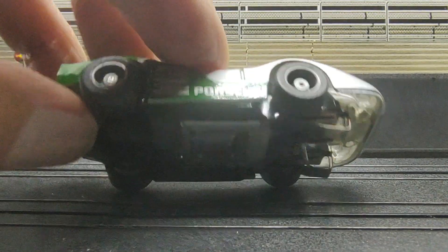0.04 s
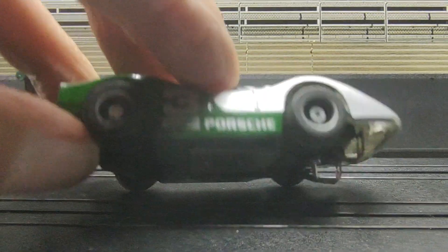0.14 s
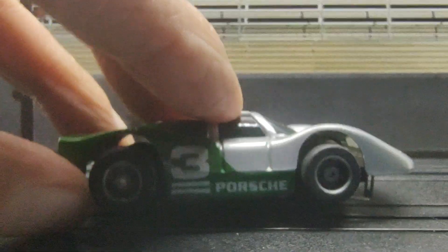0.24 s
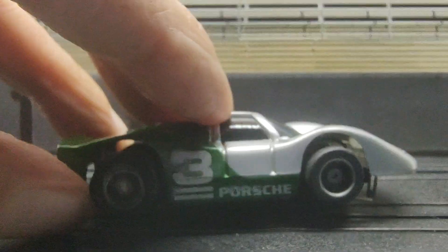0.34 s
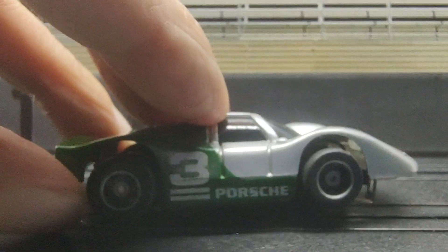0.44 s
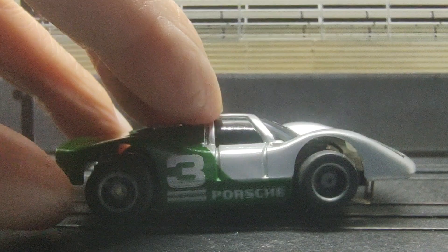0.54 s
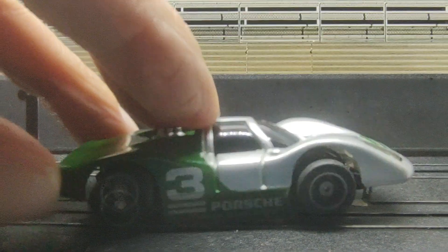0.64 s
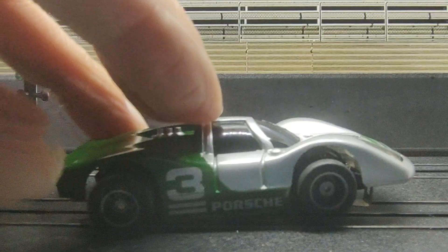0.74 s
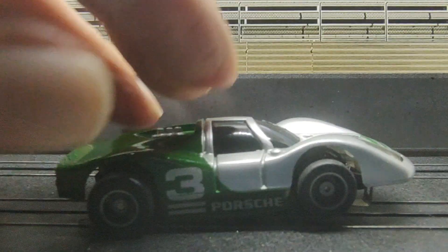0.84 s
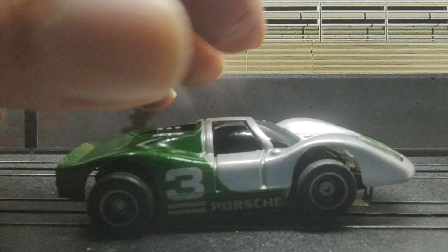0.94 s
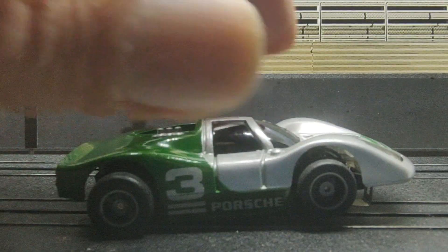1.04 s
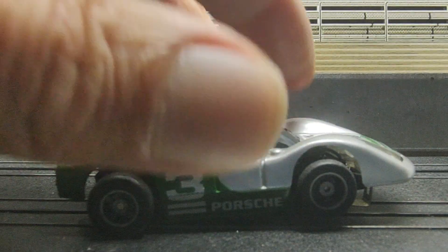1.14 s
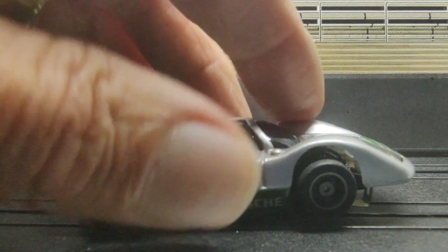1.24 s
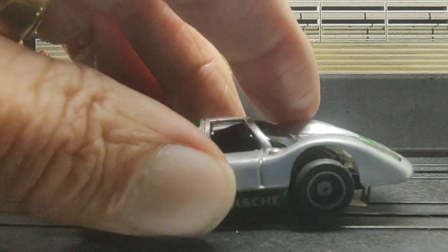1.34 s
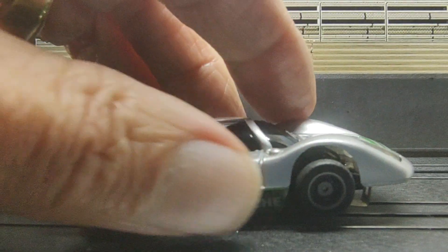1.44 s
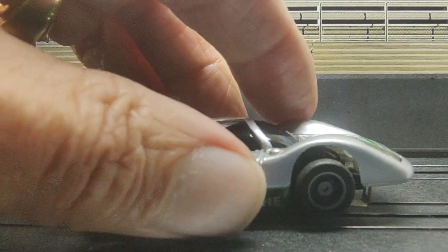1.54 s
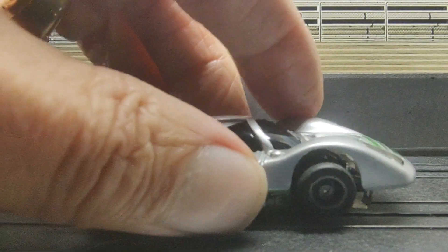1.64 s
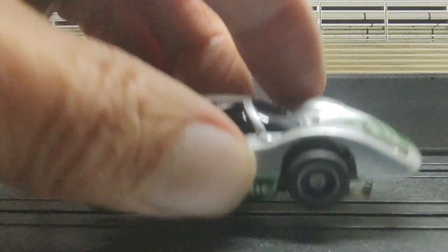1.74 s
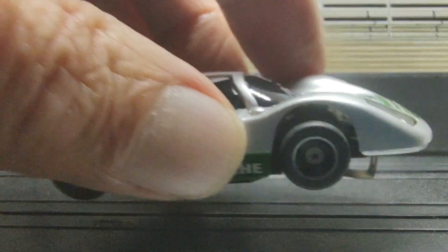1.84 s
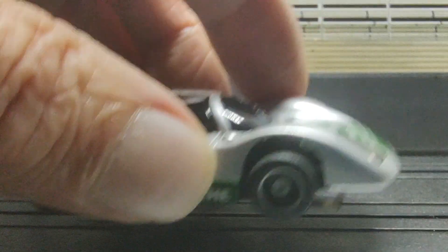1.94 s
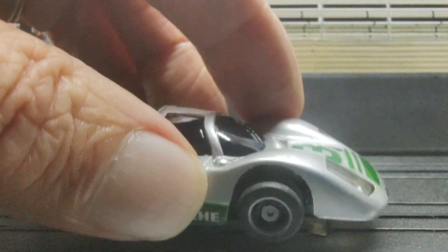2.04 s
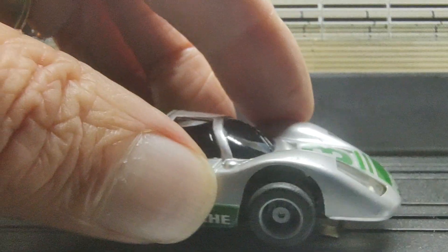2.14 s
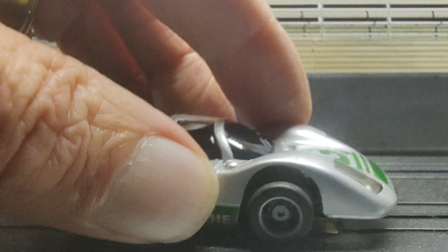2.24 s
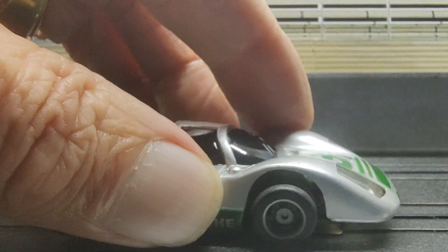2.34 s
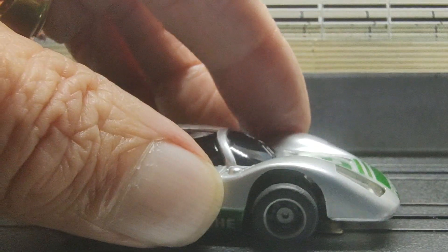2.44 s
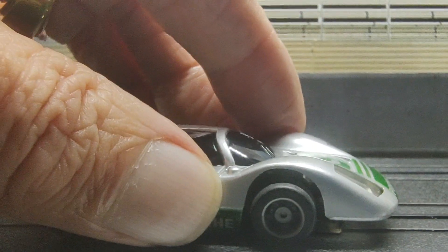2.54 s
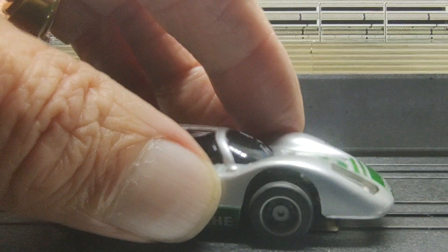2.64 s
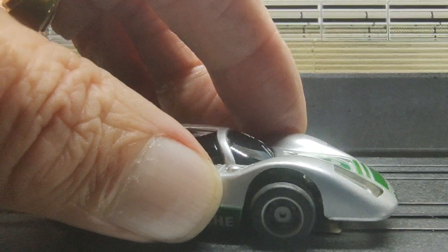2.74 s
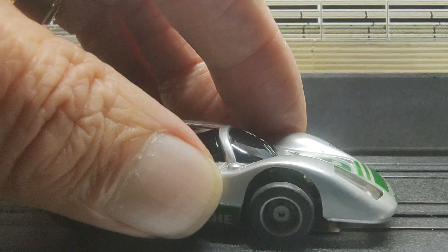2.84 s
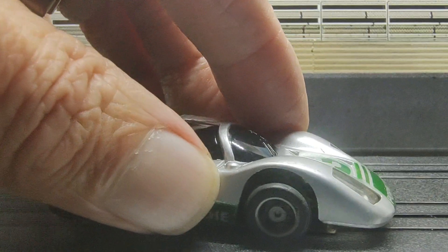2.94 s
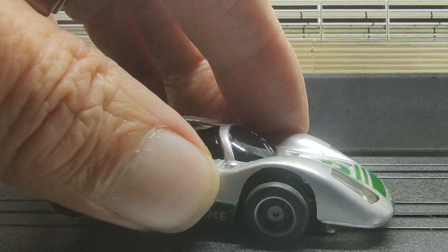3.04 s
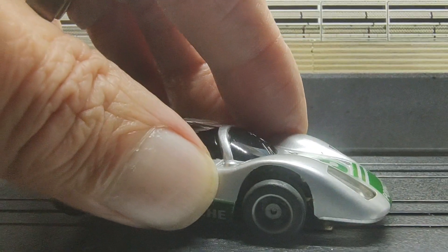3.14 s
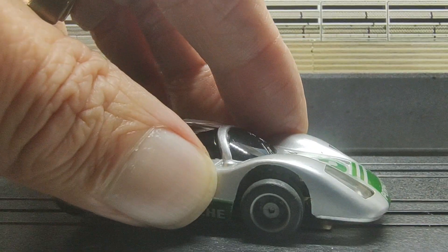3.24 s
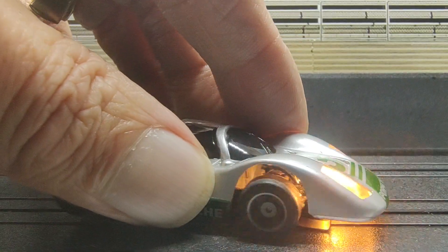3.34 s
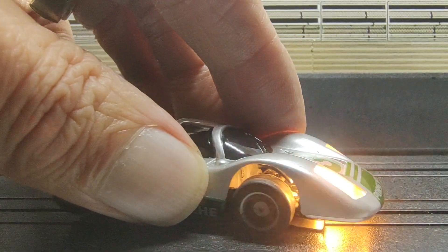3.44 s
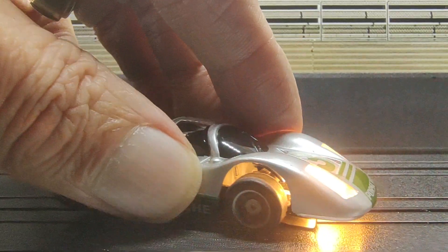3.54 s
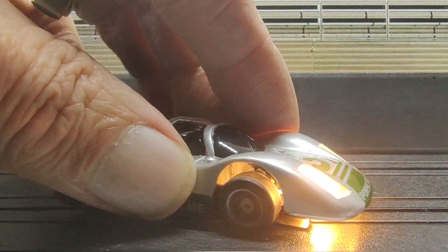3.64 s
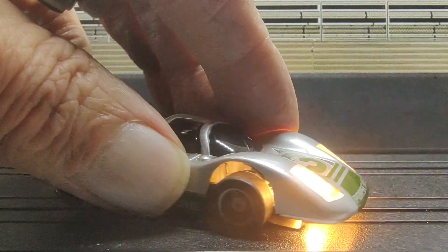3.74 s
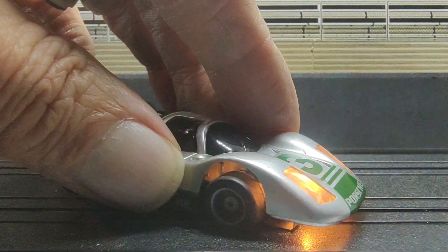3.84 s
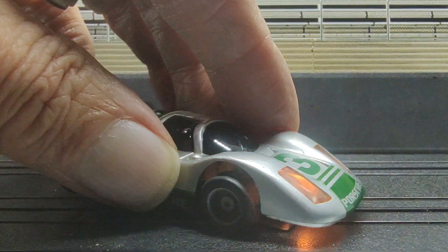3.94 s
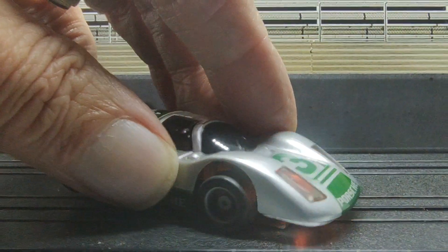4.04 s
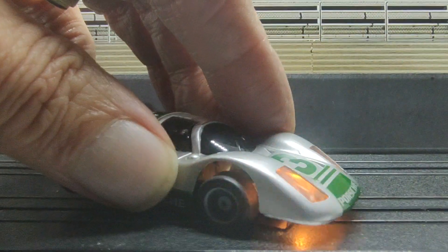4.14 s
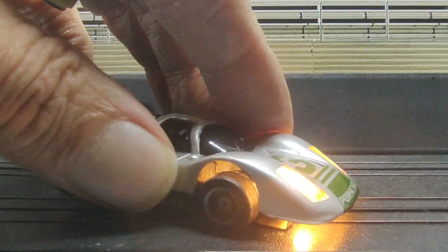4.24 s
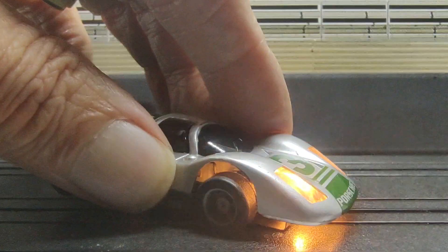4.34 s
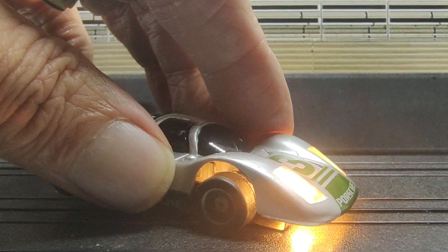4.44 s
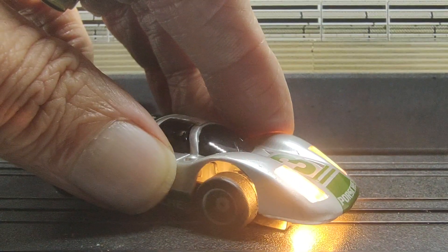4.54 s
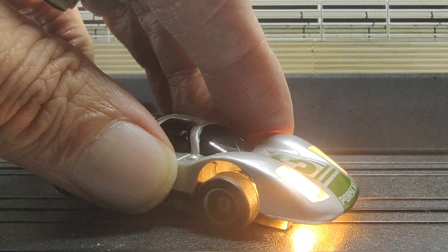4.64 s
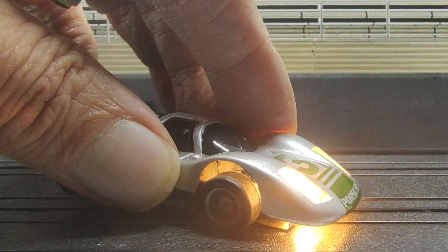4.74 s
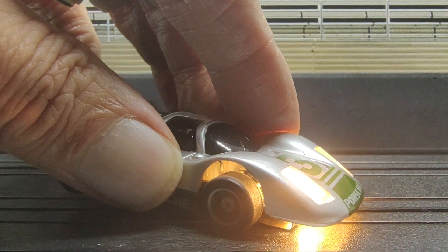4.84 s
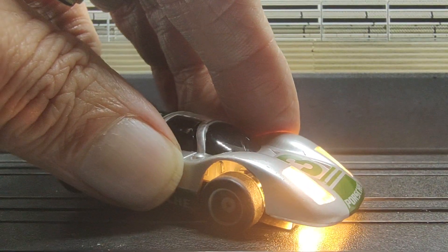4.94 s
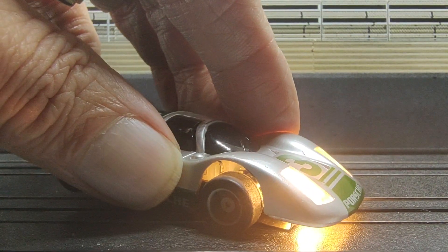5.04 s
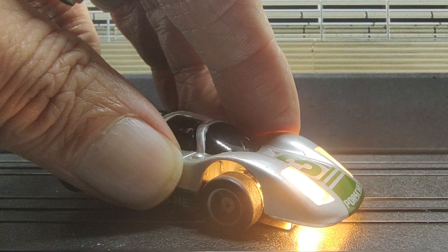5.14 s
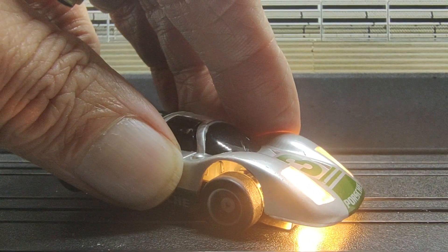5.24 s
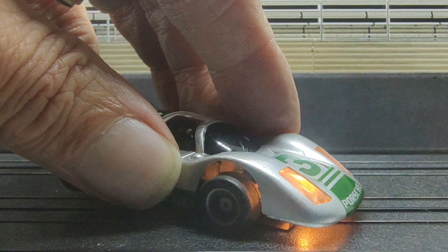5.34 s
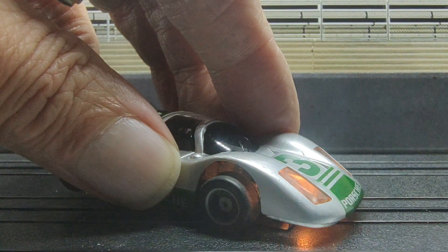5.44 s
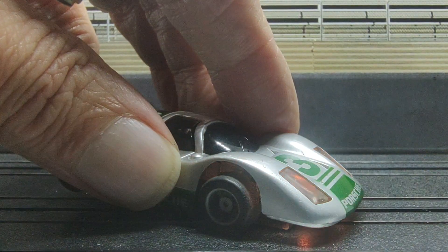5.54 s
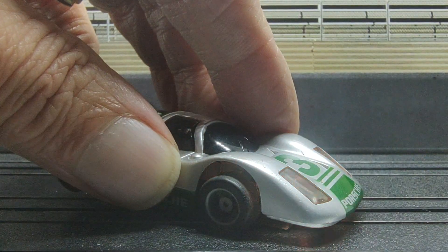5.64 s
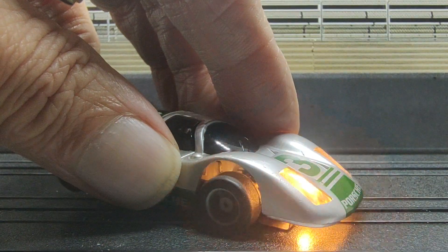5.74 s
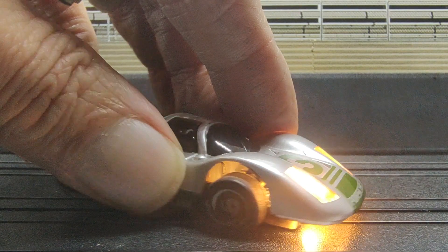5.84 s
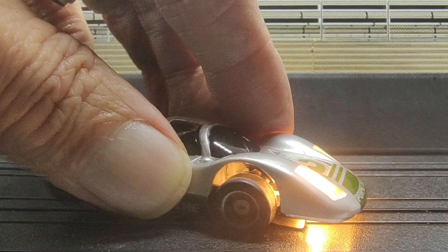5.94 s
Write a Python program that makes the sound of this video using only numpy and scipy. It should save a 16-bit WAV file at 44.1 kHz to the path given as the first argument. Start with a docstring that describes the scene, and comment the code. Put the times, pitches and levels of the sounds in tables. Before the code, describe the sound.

Dry plastic ticks and soft skin hiss come first, with one sharp click at 0.7 seconds and small metallic snaps. Then a hand-held toy car spins its wheels freely: a grainy electric whine swoops up, chatters loudly, and sinks in pitch. Two more revs follow, the middle one longest. Close stereo microphone, dry, little room sound.

```python
"""Toy slot car held on its track

Fingers tick, knock and rub a toy slot car on its plastic track, then hold it with the rear wheels spinning free.
The throttle opens three times: the unbalanced rotor whines as sine tones that follow its speed.
A 7-tooth pinion rattles in a 25-tooth crown gear; its strikes are bursts of noise, coloured by shell and chassis.
The brushes add rough overtones, and a power supply hums under it all.
"""
import sys
import numpy as np
from scipy import signal
from scipy.fft import rfft, irfft, next_fast_len
from scipy.io import wavfile
from scipy.ndimage import uniform_filter1d

SR = 44100
rng = np.random.default_rng(int(sys.argv[2]) if len(sys.argv) > 2 else 0)


def store_wav(level_fs):
    """Save 16-bit WAV to argv[1]."""
    pcm = np.round(np.clip(np.atleast_2d(level_fs), -1, 1) * 32767)
    wavfile.write(sys.argv[1], SR, pcm.T.astype(np.int16))


N = 264600  # samples: six seconds

# All levels are relative: later steps add offsets and swings. Colours are scaled to unit energy when used.

# power-supply hum: f/Hz, level/dB
HUM_TONES = [(118.4, -68), (242.2, -79)]
# colour of the room's murmur: f/Hz, level/dB
ROOM_COLOUR = [(15, -48), (25, -27), (64, -9), (95, -13.5), (121, 1), (167, -3.5), (404, -13), (604, -20.5),
               (927, -20), (1150, -27.5), (5570, -29), (8320, -27), (15000, -36)]
# likeness of left and right noise: f/Hz, likeness (0-1)
LIKENESS = [(60, 1), (250, 0.82), (500, 0.86), (1000, 0.34), (2000, 0.47), (4000, 0.057), (8000, 0.031),
            (15000, 0.054)]
# balance of the two sides: f/Hz, left minus right level/dB
SIDE_BALANCE = [(60, 0), (92, -4), (140, 1.5), (210, 0), (330, 1.5), (500, -3), (770, 5.5), (1170, -1.5),
                (1790, -1), (2740, -2.5), (4190, 2.5), (6410, -8.5), (9810, 3.5), (15000, 1.5)]
# timing of the two sides: f/Hz, left ahead of right phase/rad
SIDE_LEAD = [(0, -1.5), (1380, 0.78), (3620, 6.5), (4910, 20), (5340, 21), (5770, 16), (6290, 16),
             (7490, 18), (8100, 24), (9130, 23.5), (10400, 31), (12100, 36), (12700, 43), (13600, 45),
             (14500, 44.5), (15500, 45)]

# plastic contacts in handling: t/s, tick level/dB, body level/dB, knock level/dB
CONTACTS = [(0.2101, -45.5, -58, -62.5), (0.221, -60, -73, -72), (0.2986, -42, -61, -70),
            (0.3197, -42, -59, -74), (0.332, -36.5, -41.5, -44.5), (0.341, -53, -62, -51),
            (0.351, -56, -65, -60), (0.509, -52, -74, -63), (0.702, -39, -53, -44.5),
            (0.7063, -24.5, -61, -49), (0.712, -35, -57, -45.5), (0.721, -38, -60, -49.5),
            (1.761, -51, -67, -67), (1.803, -60, -73, -69), (1.829, -49, -65, -68), (1.841, -33, -56, -68),
            (2.0853, -51, -71, -71), (2.1905, -50, -58, -83), (2.2033, -56, -57, -64.5),
            (2.247, -64, -70, -70), (2.324, -64, -73, -66), (2.355, -60, -70, -69),
            (2.366, -30.5, -55, -72), (2.374, -38, -62, -60), (2.381, -45, -60, -71),
            (2.3965, -39.5, -58, -71), (2.582, -60, -57, -65.5), (2.9637, -51, -57, -90),
            (2.992, -62, -63, -87), (3.214, -47, -58, -75), (3.226, -54, -55, -67), (3.244, -53, -68, -76),
            (3.256, -49, -71, -79), (3.334, -36, -52, -84), (3.349, -45, -54, -76)]
# finger strokes: start t/s, length t/s, hiss level/dB, scrape level/dB
FINGER_STROKES = [(-.03, 0.045, -70, -77), (0.11, .08, -73, -87), (0.236, 0.14, -65, -74),
                  (0.47, 0.21, -69, -77), (.75, 0.21, -77, -79), (1.367, 0.28, -70.5, -86),
                  (1.544, 0.37, -70, -77), (1.782, 0.056, -62.5, -66.5), (1.95, 0.27, -76, -78),
                  (2.193, 0.091, -76, -73), (2.292, 0.13, -70, -72), (2.37, 0.25, -68, -75.5),
                  (2.6, 0.81, -71.5, -79), (2.91, 0.1, -67.5, -75), (3.125, .1, -65.5, -74),
                  (3.19, 0.082, -59, -68)]
# colours of shell tick, hollow-track knock and rubbing skin: f/Hz, level/dB
TICK_COLOUR = [(1180, -21), (2000, -24), (2700, -31), (3390, -16), (5000, -10), (6770, -15), (8550, 3.5),
               (9570, 3), (10200, 0), (12000, -18), (13800, -26), (15800, -22)]
KNOCK_COLOUR = [(47, -27), (80, -5), (140, 4.5), (230, -3.5), (400, -5.5), (560, -14), (800, -1),
                (1080, -12), (1380, -3), (1700, -13), (2500, -20), (3250, -24), (5500, -120)]
SKIN_COLOUR = [(5000, -22), (7400, -13.5), (8200, -4.5), (9600, -8), (11000, -17), (15000, -33)]
# resonances of the hand-held plastic body: f/Hz, width f/Hz, level/dB
BODY_MODES = [(930, 91, 12.5), (1370, 150, 7.5), (1850, 130, 13), (2300, 210, 9.5), (3100, 250, 7.5),
              (3480, 180, 5.5), (4060, 320, 7.5), (5030, 300, 7.5), (5750, 250, 1), (7260, 500, 5.5)]
STROKE_ATTACK_S, STROKE_RELEASE_S = 0.04, 0.051  # a stroke's rise and fade
GRIP_DB = -81  # the faint creep of the resting grip
SLIPS_PER_S, SLIP_SPREAD_DB, SLIP_T60_S = 140, 4, 0.018  # skin catches: rate, uneven strength, decay

# the metal pickup shoe meets the rail: t/s, level/dB
SHOE_SNAPS = [(1.841, -52), (2.089, -50.5), (2.1057, -58), (2.294, -63), (2.3648, -58)]
# colour of the snapping shoe: f/Hz, level/dB
SHOE_COLOUR = [(1500, -20), (2800, -21), (3420, -1), (4100, -11), (5200, 2), (6100, -8), (7500, -8),
               (15000, -30)]

# buzz of the motor breaking free: t/s, level/dB
START_BUZZ = [(3.35, -60), (3.37, -49), (3.395, -37), (3.424, -31), (3.442, -33), (3.46, -31)]
# resonances of the starting motor's can: f/Hz, level/dB
CAN_COLOUR = [(290, -48), (500, -12), (577, -20), (792, -0.5), (1100, -4), (1270, -19), (1410, -2),
              (1530, -20), (2260, -8), (2610, -20), (3010, 0), (4250, -14), (6180, -13), (8240, 10),
              (12000, -13), (15500, -20)]
# dry scratch of the brushes, a single row: t/s, half width t/s, level/dB
BRUSH_SCRATCH = (3.418, 0.018, -32.5)
# colour of that scratch: f/Hz, level/dB
BRUSH_SCRATCH_COLOUR = [(2200, -40), (3000, 6), (3400, -6), (4200, -29), (7000, -43)]

# throttle: opens t/s, closes t/s, coasting time constant t/s, bite of the gears (0-1), sparking level/dB
THROTTLE_OPENINGS = [(3.352, 3.965, .27, 0.74, 2), (4.253, 5.443, .292, 0.88, 0.5),
                     (5.823, 6.2, .29, 0.83, 0.5)]
# the hand presses down and the wheels drag: t/s, half width t/s, share of speed lost (0-1)
WHEEL_DRAGS = [(3.869, .07, .04), (4.52, .098, .185)]
BREAKAWAY_HZ, FULL_HZ = 102.1, 902  # rotor turns per second: first speed, and the speed it climbs towards
SPIN_UP_S = .076  # time constant under power
GEARING = 7 / 25  # axle turns per rotor turn

# gear chatter against speed: rotor turns f/Hz, shell level/dB, chassis level/dB, brush fizz level/dB
RATTLE_BY_SPEED = [(237, -27.5, -33, -32.5), (422, -23.5, -27, -29), (585, -19.5, -26, -28.5),
                   (895, -20, -25, -27.5)]
# brief flares and dips of the chatter: t/s, half width t/s, shell level/dB, chassis level/dB
CHATTER_FLARES = [(3.56, 0.058, -1, -0.5), (3.79, 0.067, 3, 1.5), (3.92, 0.021, 1, 1.5),
                  (4.09, 0.021, -1, 2.5), (4.19, 0.03, -2, -1), (4.262, 0.019, -4.5, -3),
                  (4.5, 0.19, 0, 1.5), (4.94, 0.046, 0, -5), (5.2, 0.11, 1.5, 1), (5.27, 0.022, -2.5, -1.5),
                  (5.55, 0.082, -2, -3.5), (5.62, 0.086, 3, 3), (5.76, 0.042, -0.5, 0),
                  (5.818, 0.018, -5, 1.5), (5.85, 0.016, -4.5, 0)]
# single hard clacks of the slack gears: t/s, level/dB
GEAR_CLACKS = [(3.46, -7), (3.4751, -5), (3.488, -4), (3.515, -8), (3.5534, -4), (4.0752, -0.5),
               (4.0946, -8), (4.099, -1), (4.103, -2), (4.127, -18), (4.174, -5), (4.1944, -9), (4.2161, 0),
               (4.283, -9), (4.296, -9), (4.3306, -1), (4.345, -13), (4.3857, -15), (4.849, -10),
               (4.983, -2), (5.136, -13), (5.5589, -5), (5.833, -8), (5.838, -10), (5.8605, -16),
               (5.875, -6), (5.8857, -4), (5.894, -1.5)]
# colours of shell, chassis, track and brush springs: f/Hz, level/dB
SHELL_COLOUR = [(4120, -33.5), (7000, -9.5), (7380, -6), (7880, -7.5), (8540, 6.5), (9030, 6),
                (10700, -1.5), (12500, -24), (16200, -67), (22000, -120)]
CHASSIS_COLOUR = [(1180, -38.5), (2000, -34), (2240, -11.5), (2470, -29), (2600, -11), (2810, -14),
                  (3470, -8), (3790, -9.5), (4100, -2.5), (4460, -8), (4950, -5.5), (6610, -6), (7200, 1.5),
                  (7800, 0), (10100, -33), (17200, -120)]
TRACK_COLOUR = [(35, -46), (60, -33), (129, -3.5), (306, -11.5), (372, -6.5), (452, -10), (518, 0),
                (593, -16.5), (755, 1), (904, 0.5), (975, 5), (1100, -4.5), (1600, -2.5), (2040, -8),
                (2200, 1.5), (2860, -32), (4840, -120)]
FIZZ_COLOUR = [(7000, -35), (11500, 7), (13200, -4), (14700, 6.5), (15300, -3.5), (15900, 4)]
# resonances of the chassis: f/Hz, width f/Hz, level/dB
CHASSIS_MODES = [(1372, 71, -3.5), (1660, 30, -4.5), (2390, 54, 0.5), (2675, 25, -0.5), (2920, 43, 1.5),
                 (3160, 82, -2.5), (3430, 130, -1), (3590, 30, -1), (3940, 170, 0), (4116, 110, 3.5),
                 (4420, 90, -8), (4765, 90, 2), (5017, 110, 3.5), (5390, 180, 4.5), (5660, 81, 5),
                 (6235, 160, 6.5)]
TRACK_DB, TRACK_SLOW_DB, TRACK_LOAD_DB = -38, 1, 11  # drone at full speed, change to standstill, and under load
TAP_DB, TAP_SCATTER = -3.5, .046  # hard shaft taps against the scraping; their scatter in turns
FLEX, FLEX_RATE, GRIP_SWAY_DB = 0.01207, 9, 2.5  # share by which resonances shift, shifts per second, level swing

# brush overtones: multiple of rotor speed, level/dB
BRUSH_OVERTONES = [(3, -0.5), (12, -0.5), (14, 3), (15, -8.5), (18, 0.5), (21, -1), (24, -3)]
# ringing of the motor frame: f/Hz, level/dB
FRAME_RESPONSE = [(1500, -70), (2100, -39), (2500, -37), (2640, -43), (2740, -63), (6000, -57), (9400, -24),
                  (10400, -28), (10850, -33), (11600, -42), (12200, -35), (12700, -36), (14100, -40),
                  (14620, -26.5), (15100, -46)]
COASTING_DB = -8  # change of the brush overtones with the throttle closed

# how well the car radiates the rotor's shaking: f/Hz, level/dB
UNBALANCE_RESPONSE = [(260, -56.5), (400, -50.5), (515, -36.5), (560, -40), (595, -53), (650, -37),
                      (710, -30), (770, -31), (840, -35.5), (905, -36.5), (1100, -28), (1230, -22),
                      (1400, -39), (1650, -40), (1750, -27), (1805, -21)]
# how well it radiates the rear wheels' wobble: f/Hz, level/dB
WHEEL_RESPONSE = [(70, -65), (112, -73), (190, -52), (243, -49.5), (251, -42)]
# tones of the drive at full speed: multiple of rotor, multiple of axle, level/dB
DRIVE_TONES = [(1, -2, -54), (0, 2, -59.5), (1, -1, -53), (0, 3, -51.5), (1, 1, -51.5)]
# tones of the meshing teeth at full speed: multiple of rotor, multiple of axle, level/dB
MESH_TONES = [(4, 0, -49.5), (7, 0, -31.5), (8, 0, -29.5), (8, 1, -31), (9, 0, -29.5)]
OCTAVE_DB = -19  # the shaking's second harmonic
LOAD_DAMPING_DB = -7.5  # gears pressed together under load steady the rotor
STUMBLE = 3.6  # phase jitter near standstill, radians
WHINE_FLICKER_DB, SLOW_FLICKER_DB = 0.77, 3.5  # unsteadiness at full speed, and its gain towards standstill

TOP_HZ = 15720  # upper band limit


def amp(db):
    """Turn decibels into gain."""
    return 10 ** (np.asarray(db) / 20)


def unit(x):
    """Scale a signal to rms 1."""
    return x / np.sqrt(np.mean(x ** 2) + 1e-20)


def along(points, hz):
    """Read (frequency, value) points on a log axis, as hearing spaces pitch."""
    f, v = np.transpose(points)
    return np.interp(np.log(hz + 1), np.log(f + 1), v)


def curves(rows):
    """Draw one value per sample for each column after the time."""
    s, *cols = np.transpose(rows)
    return [np.interp(np.arange(N) / SR, s, c) for c in cols]


def after(s, fade=0.0087):
    """A soft switch that starts to rise at time s and takes fade seconds."""
    return np.clip((np.arange(N) / SR - s) / fade, 0, 1)


def swell(s, width):
    """A bell-shaped rise and fall of height 1 around time s."""
    return 1 / (1 + ((np.arange(N) / SR - s) / width) ** 2) ** 2


def wobble(rate):
    """A smooth random curve with about rate new values a second."""
    return signal.resample(rng.standard_normal(int(N * rate / SR) + 2), N)


def filtered(x, response):
    """Multiply the spectrum of x by a complex response of frequency."""
    m = next_fast_len(N + SR // 4)
    return irfft(rfft(x, m) * response(np.fft.rfftfreq(m, 1 / SR)), m)[..., :N]


def coloured(x, spectrum, size=4096):
    """Give x a colour with a filter of unit energy that never rings ahead of the sound."""
    gain = amp(along(spectrum, np.fft.rfftfreq(size, 1 / SR)))
    # folding the cepstrum makes the filter minimum-phase
    cepstrum = irfft(np.log(np.maximum(gain, 1e-5)))
    cepstrum[1:size // 2] *= 2
    cepstrum[size // 2 + 1:] = 0
    ring = irfft(np.exp(rfft(cepstrum)))
    return signal.fftconvolve(x, ring[None] / np.linalg.norm(ring), axes=1)[:, :N]


def resonated(x, modes):
    """Ring x through resonances, each loudest at its centre frequency and with alternating sign."""
    def response(f):
        total = 0
        for k, (centre, width, db) in enumerate(modes):
            damping = 1j * f * width
            total = total + (-1) ** k * amp(db) * damping / (centre * centre - f * f + damping)
        return total
    return filtered(x, response)


def noise():
    """White stereo noise, alike in the bass and looser in the treble."""
    def mid_and_side(hz):
        turn = np.arccos(np.clip(along(LIKENESS, hz), 0, 1)) / 2
        return np.array([np.cos(turn), np.sin(turn)])
    mid, side = filtered(rng.standard_normal((2, N)), mid_and_side)
    return np.array([mid + side, mid - side])


def bursts(times, sizes, t60):
    """The envelope of blows that each fall by 60 dB in t60 seconds; their powers add."""
    at = np.clip(np.round(times * SR).astype(int), 0, N - 1)
    power = np.bincount(at, sizes ** 2, N)
    return np.sqrt(signal.lfilter([1], [1, -amp(-120 / (t60 * SR))], power))


def room():
    """Power-supply hum, wavering slightly in level, over the low noise of the air."""
    t = np.arange(N) / SR
    hum = sum(amp(db + 0.31 * wobble(4.8)) * np.sin(2 * np.pi * hz * t) for hz, db in HUM_TONES)
    return np.sqrt(2) * hum + amp(-67.5) * coloured(noise(), ROOM_COLOUR)


def walls(x, echo_db=-11, t60=0.097):
    """The track, its barrier and the hand return the sound within milliseconds and ripple its spectrum."""
    t = np.arange(SR // 16) / SR
    echoes = rng.standard_normal((2, len(t))) * amp(-60 * t / t60) * (t > .001)
    echoes *= amp(echo_db) / np.linalg.norm(echoes, axis=1, keepdims=True)
    reflected = signal.fftconvolve(x, echoes, axes=1)[:, :N]
    return (x + reflected) / np.hypot(1, amp(echo_db))


def placed(x):
    """The car is nearer the left microphone, and each side has its own colour and delay."""
    side = np.array([[.5], [-.5]])
    return filtered(x, lambda hz: amp(side * along(SIDE_BALANCE, hz)) * np.exp(1j * side * along(SIDE_LEAD, hz)))


def rubbing():
    """Gains of hiss and scrape: each finger stroke swells, holds and fades; their powers add."""
    t = np.arange(N) / SR
    power = np.full((2, N), amp(2 * GRIP_DB)) * [[1], [.2]]
    for s, length, hiss_db, scrape_db in FINGER_STROKES:
        fade = np.exp(-np.maximum(t - s - length, 0) / STROKE_RELEASE_S)
        stroke = after(s, fade=STROKE_ATTACK_S) * fade
        power += (amp([[hiss_db], [scrape_db]]) * stroke) ** 2
    return np.sqrt(power)


def stick_slip():
    """Force of rms 1: skin catches and lets go in small uneven jerks over a smooth drag."""
    times = rng.uniform(0, N / SR, int(SLIPS_PER_S * N / SR))
    sizes = amp(SLIP_SPREAD_DB * np.clip(rng.standard_normal(len(times)), -2, 1.7))
    jerks = unit(bursts(times, sizes, SLIP_T60_S))
    return unit(np.hypot(jerks, .6))


def handling(echo_db=-25, rise_s=0.00089):
    """Contacts tick in the shell and knock on the hollow track; skin hisses and scrapes over the plastic."""
    s, tick_db, body_db, knock_db = np.transpose(CONTACTS)
    sliding, scraping = rubbing()
    cushion = np.exp(-1 / (rise_s * SR))

    def blows(db, t60):
        # fingers cushion the attack; nearby surfaces add a short, weak tail
        sharp = np.hypot(bursts(s, amp(db), t60), bursts(s, amp(db + echo_db), t60=0.13))
        return signal.lfilter([1 - cushion], [1, -cushion], sharp)

    # skin sticks and slips until the hand holds still
    moving = 1 - after(3.32)
    ticks = coloured(noise() * blows(tick_db + 0.5, t60=0.011), TICK_COLOUR)
    body_force = np.hypot(blows(body_db + 1.5, t60=0.022), moving * stick_slip() * scraping)
    body = resonated(noise() * body_force, BODY_MODES)
    knocks = coloured(noise() * blows(knock_db + 12.5, t60=0.017), KNOCK_COLOUR)
    hiss = coloured(noise() * moving * sliding * amp(1.0 + 1.3 * wobble(90)), SKIN_COLOUR)
    return ticks + body + knocks + hiss


def pickup():
    """The springy metal shoe snaps brightly each time it meets the rail."""
    s, db = np.transpose(SHOE_SNAPS)
    return coloured(noise() * bursts(s, amp(db), t60=0.023), SHOE_COLOUR)


def rotor():
    """Speed, angle in turns and gear load: power spins the rotor up along an S-curve, friction slows it."""
    t = np.arange(N) / SR
    speed, powered = np.full(N, float(BREAKAWAY_HZ)), np.zeros(N)
    for opens, closes, coast_s, bite, _ in THROTTLE_OPENINGS:
        to_gain = FULL_HZ / np.interp(opens, t, speed) - 1
        rising = FULL_HZ / (1 + to_gain * np.exp(-np.clip(t - opens, 0, closes - opens) / SPIN_UP_S))
        coasting = np.exp(-np.maximum(t - closes, 0) / coast_s)
        speed = np.where(t < opens, speed, rising * coasting)
        powered += bite * (after(opens + 0.018, fade=0.028) - after(closes, fade=0.012))
    for s, width, share in WHEEL_DRAGS:
        speed = speed * (1 - share * swell(s, width))
    # the motor pulls hardest when it is powered but slow
    load = powered * np.clip(1 - speed / FULL_HZ, 0, 1)
    speed = speed * (1 + .002 * wobble(40) + .002 * wobble(6))
    return speed, np.cumsum(speed) / SR, load


def start(turns, sharpness=4.6, drag=0.28, uneven_db=2):
    """The first slow turns jerk the motor can twice each: an uneven buzz with a scratch of the brushes."""
    jerks = unit(np.abs(np.sin(2 * np.pi * turns)) ** sharpness + drag) * amp(uneven_db * wobble(150))
    buzz = coloured(noise() * jerks * amp(curves(START_BUZZ)[0] + 9.5), CAN_COLOUR)
    s, width, db = BRUSH_SCRATCH
    scratch = coloured(noise() * jerks * amp(db) * swell(s, width), BRUSH_SCRATCH_COLOUR)
    return (buzz + scratch) * after(3.355) * (1 - after(3.455))


def sparking_db():
    """Level of the brushes, which seat differently each time the throttle opens."""
    opens, *_, db = np.transpose(THROTTLE_OPENINGS)
    return db[np.maximum(np.searchsorted(opens, np.arange(N) / SR) - 1, 0)]


def rattle_levels(speed, load, shell_load_db=6.5, chassis_load_db=6, fizz_load_db=9, waver_db=2.03):
    """Levels of shell, chassis, fizz and track follow speed and load, flare, and waver more in slack gears."""
    hz, *columns = np.transpose(RATTLE_BY_SPEED)
    shell, chassis, fizz = [np.interp(speed, hz, db) for db in columns]
    shell_flare, chassis_flare = sum(np.outer(db, swell(s, width)) for s, width, *db in CHATTER_FLARES)
    slack = 1 - speed / FULL_HZ
    waver = waver_db * (slack + 0.21) * wobble(30)
    return waver + np.array([
        shell + shell_load_db * load + shell_flare,
        chassis + chassis_load_db * load + chassis_flare,
        fizz + fizz_load_db * load + shell_flare + sparking_db(),
        TRACK_DB + TRACK_SLOW_DB * slack + TRACK_LOAD_DB * load + chassis_flare])


def strikes(speed, turns, shared, own_db, runout_db, scrape):
    """The pinion strikes once a turn, harder on one side of the crown gear, and scrapes in between."""
    at = np.flatnonzero(np.diff(np.floor(turns)))
    chance = np.clip(rng.standard_normal((len(at), 2)), -2, 2)
    crown_side = np.sin(2 * np.pi * GEARING * turns[at])
    sizes = amp(shared[at] + own_db * chance[:, 0] + runout_db * crown_side)
    blows = bursts(at / SR + .2 * chance[:, 1] / speed[at], sizes, t60=0.011)
    # even out the slow level, which is set elsewhere
    blows /= np.sqrt(np.abs(uniform_filter1d(blows ** 2, size=2205)) + 1e-9)
    return after(3.425, fade=0.039) ** 2 * unit(np.hypot(blows, scrape))


def taps(turns, spread_db=6):
    """The shaft taps its bearing once a turn, unevenly, so blurred overtones glide with the speed."""
    at = np.flatnonzero(np.diff(np.floor(turns)))
    chance = np.clip(rng.standard_normal((len(at), 2)), -2, 2)
    where = np.interp(np.floor(turns[at]) + 1 + TAP_SCATTER * chance[:, 0], turns, np.arange(N))
    train = np.bincount(np.round(where).astype(int), amp(spread_db * chance[:, 1]), N) * after(3.45)
    return unit(train - uniform_filter1d(train, size=49))


def gripped(force, count=3):
    """The chassis rings under the changing grip, which bends and damps each group of resonances its own way."""
    samples, ringing = np.arange(N), 0
    for k in range(count):
        # reading slightly early or late shifts the pitch
        at = samples + FLEX * SR / (2 * FLEX_RATE) * wobble(FLEX_RATE)
        group = np.interp(at, samples, resonated(force, CHASSIS_MODES[k::count]))
        ringing = ringing + amp(GRIP_SWAY_DB * wobble(FLEX_RATE)) * group
    return ringing


def chatter(speed, turns, load):
    """Rattling gears shake shell, chassis, brush springs and track; every strike divides its force anew."""
    shell_db, chassis_db, fizz_db, track_db = rattle_levels(speed, load)
    jolts = 1.3 * wobble(450) + 0.3 * wobble(90)
    # under load the teeth stay in contact and scrape more
    contact = speed / FULL_HZ + 1.1 * load

    def shaken(db, own_db, runout_db, scrape):
        return noise() * strikes(speed, turns, jolts, own_db, runout_db, scrape * contact) * amp(db)

    shell = coloured(shaken(shell_db + 2.0, own_db=1.0, runout_db=4.0, scrape=0.37), SHELL_COLOUR)
    chassis = coloured(shaken(chassis_db - 1.5, own_db=2.0, runout_db=4.0, scrape=0.34), CHASSIS_COLOUR)
    # one channel of force: both microphones hear the same ringing of the chassis
    scraped = shaken(chassis_db - 3.0, own_db=1.5, runout_db=0.0, scrape=0.63)[0]
    ring = gripped(scraped + amp(chassis_db + TAP_DB) * taps(turns))
    fizz = coloured(shaken(fizz_db + 4.5, own_db=2.7, runout_db=2.5, scrape=0.72), FIZZ_COLOUR)
    track = coloured(shaken(track_db, own_db=0.5, runout_db=0.0, scrape=0.13), TRACK_COLOUR)
    s, db = np.transpose(GEAR_CLACKS)
    clacks = coloured(noise() * bursts(s, amp(db - 3.5), t60=0.0082), SHELL_COLOUR)
    return shell + chassis + ring + fizz + track + clacks


def brushes(speed, turns):
    """Three commutator bars pass per turn; rough overtones flare as they cross the frame's resonances."""
    tones = 0
    for k, db in BRUSH_OVERTONES:
        level_db = along(FRAME_RESPONSE, k * speed) + db + 4.1 * wobble(25)
        roughness = (.7 + .025 * k) * wobble(240)
        tones = tones + amp(level_db) * np.sin(2 * np.pi * k * turns + roughness)
    # without current the brushes only slide, and sing less
    current = sum(after(opens) - after(closes) for opens, closes, *_ in THROTTLE_OPENINGS)
    gain = amp(sparking_db() + COASTING_DB * (1 - current)) * speed / FULL_HZ
    return after(3.45) * tones * np.sqrt(2) * gain


def partials(table, turns, slack, flicker_db, blur_rate=110):
    """Sum and difference tones of rotor and axle; play in the gears blurs their phase."""
    total = 0
    for k, j, db in table:
        phase = 2 * np.pi * (k + j * GEARING) * turns + slack * wobble(blur_rate)
        total = total + amp(db + flicker_db * wobble(45)) * np.sin(phase)
    return np.sqrt(2) * total


def whine(speed, turns, load):
    """Rotor and wheels shake the car, loud where it resonates; tooth tones grow steeply with speed."""
    # the slower the rotor, the more it stumbles in the slack of the gears
    slow = 1 - speed / FULL_HZ
    angle = 2 * np.pi * turns + STUMBLE * slow ** 2 * wobble(150)
    flicker_db = WHINE_FLICKER_DB + SLOW_FLICKER_DB * slow

    def shake(order):
        level_db = along(UNBALANCE_RESPONSE, order * speed) + flicker_db * wobble(60)
        return amp(level_db) * np.sin(order * angle)

    unbalance = np.sqrt(2) * amp(LOAD_DAMPING_DB * load) * (shake(order=1) + amp(OCTAVE_DB) * shake(order=2))
    axle = 2 * np.pi * GEARING * turns
    wheel_db = along(WHEEL_RESPONSE, GEARING * speed) + 1.4 * wobble(30)
    wheels = np.sqrt(2) * amp(wheel_db) * np.sin(axle)
    drive = (speed / FULL_HZ) ** 7 * partials(DRIVE_TONES, turns, slack=0.1, flicker_db=4.0)
    # the crown gear runs out of true, which puts sidebands around every tooth tone
    runout = 1 + 0.81 * np.cos(axle) + .5 * np.cos(2 * axle)
    mesh = partials(MESH_TONES, turns, slack=1.3, flicker_db=2.5, blur_rate=170)
    teeth = (speed / FULL_HZ) ** 9 * runout * mesh
    return after(3.4) * (unbalance + wheels + drive + teeth)


def scene():
    """The car under the hand, in a quiet room."""
    speed, turns, load = rotor()
    tones = whine(speed, turns, load) + brushes(speed, turns)
    rasp = walls(chatter(speed, turns, load) + start(turns))
    return placed(tones + rasp + handling() + pickup()) + room()


def record(dry, low_hz=40):
    """Round off the highest peaks, thin the deepest bass and keep almost nothing above the band limit."""
    rounded = dry / (1 + np.abs(dry / .9) ** 8) ** (1 / 8)
    thinned = filtered(rounded, lambda hz: 1j * hz / (1j * hz + low_hz))
    return filtered(thinned, lambda hz: 1 / np.sqrt(1 + (hz / TOP_HZ) ** 600))


dry = scene()
out = record(dry)
store_wav(out)
```